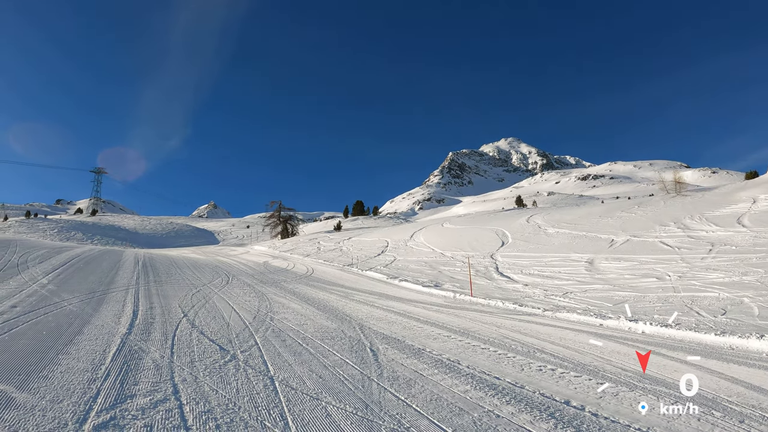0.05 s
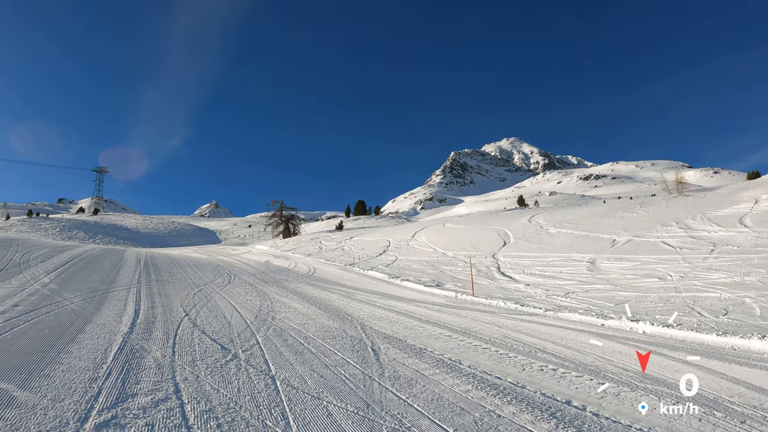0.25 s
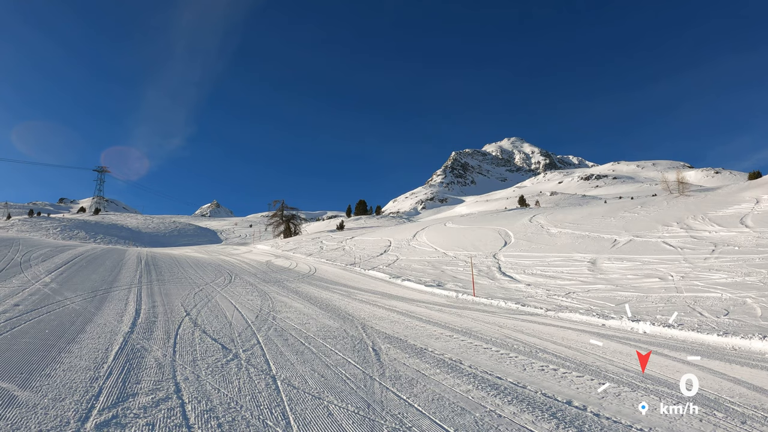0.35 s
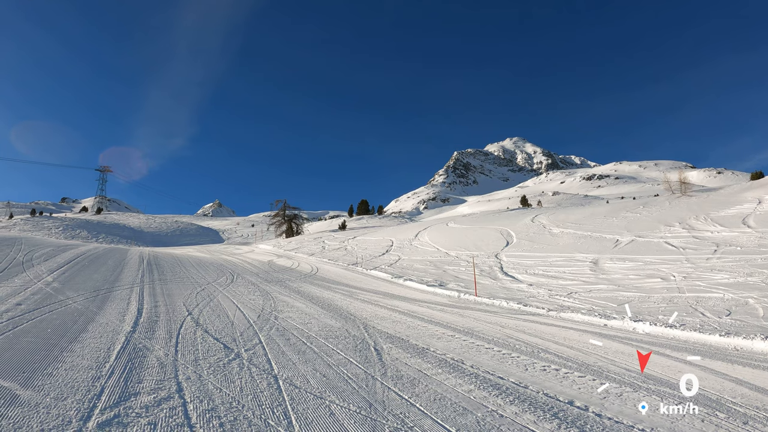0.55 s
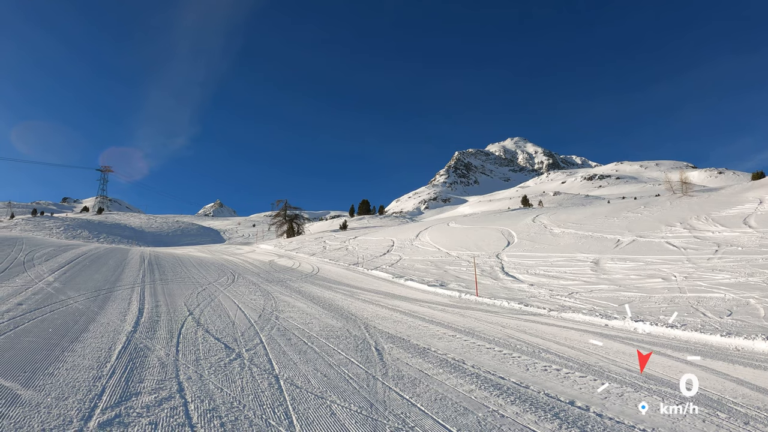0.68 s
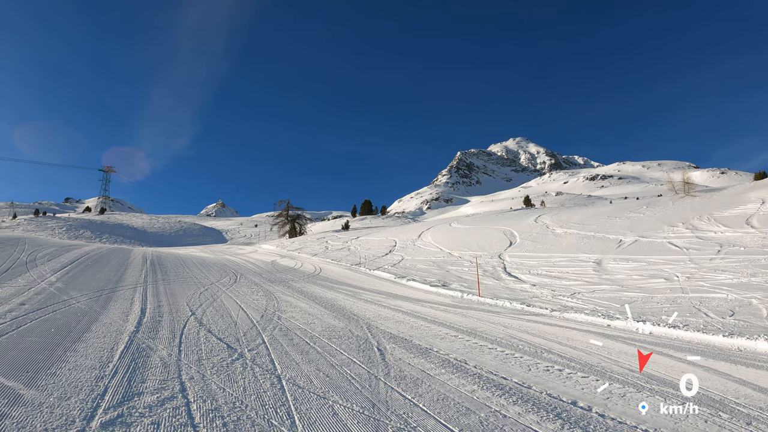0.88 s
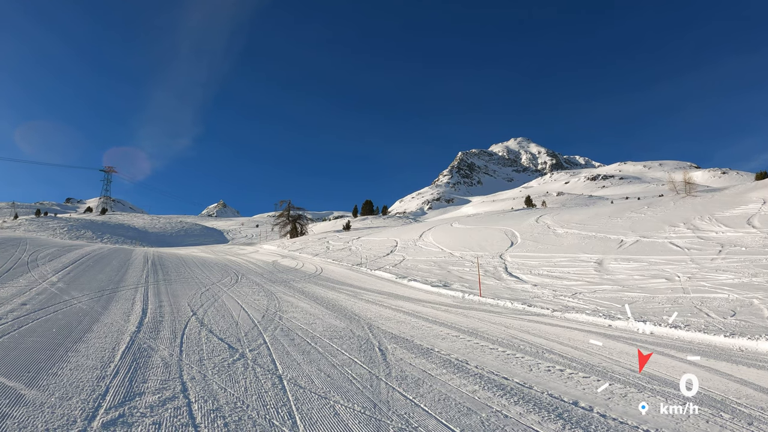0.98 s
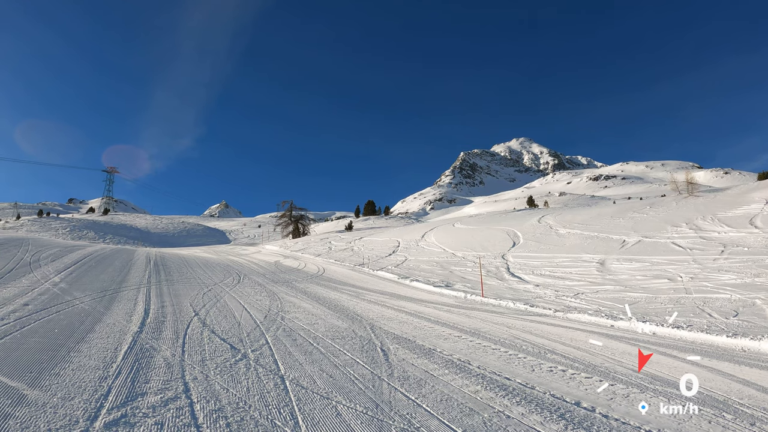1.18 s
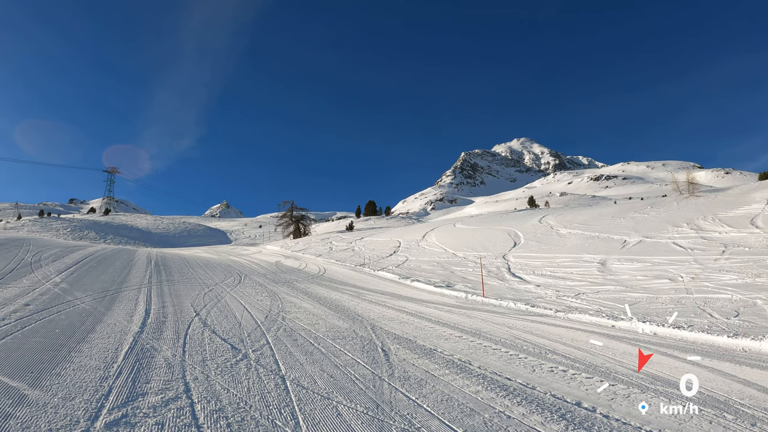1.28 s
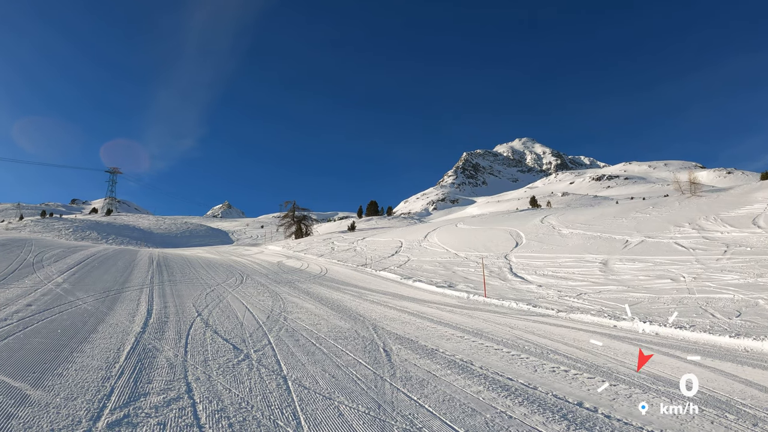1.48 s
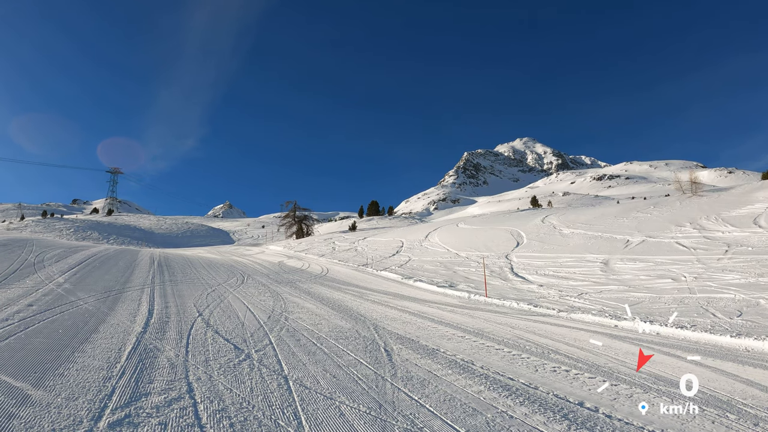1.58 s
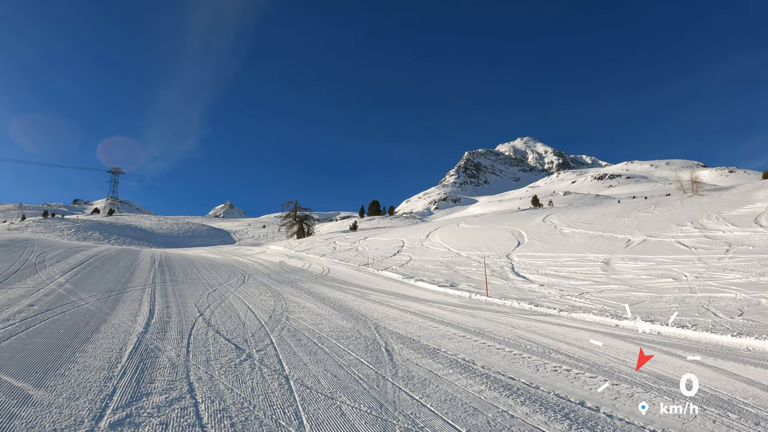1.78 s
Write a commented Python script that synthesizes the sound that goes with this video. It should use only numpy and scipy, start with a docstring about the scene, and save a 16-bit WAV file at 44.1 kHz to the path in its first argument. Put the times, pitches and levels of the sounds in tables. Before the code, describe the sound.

A piece of ski gear knocks sharply close to the microphone, bounces with a brief ring and slides to rest. Dry creaks, jacket swishes and soft bumps follow as it is handled, over light wind on a snowy slope.

```python
"""Gear knock on a ski slope

A piece of gear knocks close by, bounces with a ring and sings briefly as it slides to rest.
Then it is handled: a scuff, dry stick-slip creaks, swishes of jacket cloth and soft bumps.
Light wind rumbles on the microphone throughout."""
import sys
import numpy as np
from scipy import signal
from scipy.fft import rfft, irfft
from scipy.io import wavfile

SR = 44100
rng = np.random.default_rng(int(sys.argv[2]) if len(sys.argv) > 2 else 0)


def bounce(signal):
    """Save signal as a 16-bit WAV file at the path given by the first command-line argument."""
    frames = np.transpose(np.atleast_2d(signal))
    limited = np.clip(frames, -1, 1)
    pcm = np.round(limited * 32767).astype(np.int16)
    wavfile.write(sys.argv[1], SR, pcm)


N = 81585
T = np.arange(N) / SR

# hush of the open slope: freq_hz, density_db
AIR_SPECTRUM = [(200, -93), (400, -102), (800, -106), (1200, -103), (1700, -108), (2400, -117),
                (3500, -123), (6000, -122), (10000, -137)]
# wind buffeting over time: time_s, level_db
GUST_LEVELS = [(0, -49), (.11, -59), (.15, -48), (.225, -48.5), (.27, -58), (.38, -84), (.47, -61.5),
               (.62, -60), (.75, -63.5), (1.0, -54), (1.2, -60.5), (1.29, -48.5), (1.45, -51),
               (1.65, -53.5), (1.85, -64.5)]
# colour of the buffeting: freq_hz, relative_db
BUFFET_SPECTRUM = [(12, -2), (25, 8.5), (40, -2), (60, -12.5), (120, -14.5), (220, -16.5), (350, -26.5),
                   (700, -42), (2000, -77)]
# two low resonances in the rumble: pitch_hz, half_width_hz
DRONE_BANDS = [(91, 16), (170, 20)]
# how they swell: time_s, lower_db, upper_db
DRONE_LEVELS = [(0, -64.5, -52.5), (.13, -55.5, -72.5), (.26, -75, -61.5), (.36, -74, -55.5),
                (.5, -53, -60), (.58, -70, -70.5), (.67, -63, -60.5), (.75, -72.5, -72.5), (.83, -54, -73),
                (.95, -68, -66.5), (1.11, -53, -58.5), (1.22, -63, -67), (1.36, -61, -65),
                (1.56, -57.5, -65), (1.7, -53, -69), (1.75, -59, -68.5), (1.85, -49.5, -52.5)]

# faint bed of clothing rustle: time_s, rub_db, hiss_db
RUSTLE_LEVELS = [(0, -100, -104), (.1, -94, -93), (.2, -64, -75.5), (.45, -69, -75.5), (.58, -77, -75.5),
                 (.68, -73.5, -79), (.88, -73, -76), (1.0, -80, -82.5), (1.25, -68, -70.5), (1.4, -69, -86),
                 (1.52, -67.5, -79.5), (1.66, -66, -84), (1.72, -85, -89), (1.85, -91, -94)]
# jacket swishes: peak_s, rise_s, fall_s, rub_db, hiss_db
CLOTH_SWISHES = [(0.19, 0.11, 0.037, -68.5, -82), (0.51, 0.022, 0.033, -65, -70),
                 (0.526, .005, 0.0082, -56, -64), (0.773, 0.0077, 0.0084, -64.5, -76.5),
                 (1.065, 0.039, 0.17, -68.5, -92), (1.32, 0.052, .036, -67.5, -63.5),
                 (1.45, 0.15, 0.03, -72.5, -76.5), (1.600, 0.03, 0.03, -60, -67),
                 (1.638, 0.0075, 0.012, -59.5, -80.5)]
# colour of the cloth's mid rub: freq_hz, relative_db
RUB_SPECTRUM = [(200, -7.5), (400, -7), (650, -1), (820, -11), (1000, 3), (1300, 3), (1700, -0.5),
                (2700, -5), (4000, -11), (8000, -26.5), (14000, -42.5)]
# colour of its bright hiss: freq_hz, relative_db
HISS_SPECTRUM = [(1000, -23.5), (3300, -11), (5000, 0), (7300, 1), (9000, -5), (10500, -12.5),
                 (12300, -16.5), (14000, -31.5)]

# soft handling bumps: start_s, level_db
BUMP_HITS = [(0.508, -53.5), (1.3668, -46), (1.6348, -46.5)]
# body of a bump: pitch_hz, relative_db, t60_s
BUMP_BODY = [(455.7, -5, 0.015), (706, -2, 0.008), (1278, -1.5, .009)]
# creaking ticks: start_s, body_db, crackle_db, pitch_ratio
CREAK_TICKS = [(0.1561, -63, -55.5, 0.9), (0.1837, -66, -54.5, 0.76), (0.3342, -40, -56, 0.74),
               (0.887, -64.5, -57, 0.65), (0.973, -50, -53.5, 0.74), (0.988, -64, -58, 1.1),
               (1.0096, -44.5, -59, 0.85), (1.0200, -58, -70, 1.5), (1.0327, -45, -52.5, 1.12),
               (1.0375, -52.5, -62, 2.34), (1.0472, -41, -46, 1.02), (1.0498, -56, -52.5, 0.62),
               (1.0553, -56, -66, 1.0), (1.0652, -47, -47, 1.58), (1.0786, -52, -46, 2.8),
               (1.0924, -66, -45, 1.3), (1.1105, -45, -52, 0.96), (1.1334, -42, -56, 1.06),
               (1.157, -37, -47, 1.06), (1.1584, -44.5, -58, 1.45), (1.1818, -37.5, -56, 1.14),
               (1.5020, -64, -55, 0.56)]
# body of a tick: base_pitch_hz, relative_db, t60_s
TICK_BODY = [(1280, -2.5, 0.0063), (1970, -1, 0.0039), (2610, -8, 0.0035)]
# colour of a tick's crackle: freq_hz, relative_db
CRACKLE_SPECTRUM = [(500, 4.5), (1200, 8), (2600, -3), (5500, -0.5), (7800, -3.5), (10000, -18),
                    (11800, -20), (13200, -38)]

# the gear singing as it slides: time_s, level_db
SINGING_LEVELS = [(0.36, -110), (0.41, -61.5), (0.48, -69), (0.505, -74), (0.53, -55.5), (0.555, -67),
                  (0.6, -94), (0.66, -120)]
# the gear's modes: pitch_hz
GEAR_PITCHES = (498, 705, 998, 1332, 1668, 2168, 2475, 2742, 3205, 3675, 4170, 5020, 5600, 7400)
# ring of each mode: relative_db, base_t60_s
GEAR_DECAYS = [(-49.5, 0.078), (-38.5, .05), (-38.5, 0.09), (-31.5, .045), (-31, 0.047), (-27.5, 0.03),
               (-27, 0.033), (-18, 0.028), (-33, 0.041), (-30, 0.03), (-26, 0.01), (-27, 0.011),
               (-33.5, .011), (-43, 0.012)]
# the gear's dense, weaker overtones: freq_hz, relative_db
OVERTONE_SPECTRUM = [(150, -77.5), (300, -75.5), (450, -84), (800, -67.5), (1250, -62.5), (2700, -66.5),
                     (4500, -70), (6500, -78), (8500, -82.5), (13000, -108)]
# bounces: start_s, gain_db, brightness_hz, ring_length_ratio, retouch_delay_s, retouch_ratio, crack_db
BOUNCES = [(0.2298, -0.5, 9900, 1.21, 0.0018, 0.08, 6), (0.2422, -21, 2197, .6, .001, .2, 4),
           (0.3060, -13, 6000, 1.15, .0055, 0.6, 3), (0.3672, -18.5, 5900, 0.99, 0.001086, 0.74, 9),
           (0.4158, -32.5, 2960, 1.45, 0.0011, 0.64, -19), (0.4565, -37.5, 2660, 0.48, 0.0011, 0.5, -9)]

WIND_SIDE_DB, DRONE_SIDE_DB, AIR_SIDE_DB, NEAR_SIDE_DB = -17, -9.5, -2, -14   # stereo width
WIND_PAN_DB, CLOTH_PAN_DB, HANDLING_PAN_DB, KNOCK_PAN_DB = -6, 2, 3, -1
GRAIN_DB, GRAIN_PER_S = 1.5, 500
CRACKLE_T60_S, TICK_TAIL_DB, TICK_TAIL_T60_S, TICK_TOP_HZ = 0.0063, -21, 0.045, 11000
SINGING_HZ, SINGING_HALF_WIDTH_HZ = 1355, 110
OVERTONE_T60_S, CRACK_T60_S = 0.041, 0.0047
PORT_HZ, PORT_Q, PORT_SKEW_DB = 2500, 2.6, -7.5
DECAY_BOW = 1.2   # above 1, a ring holds at first and then drops faster
HIGH_CUT_HZ = 13600


def from_db(db):
    """Decibels to gain."""
    return 10 ** (np.asarray(db) / 20)


def level(rows, column=1):
    """Fader ride from one dB column of a timed table."""
    rows = np.array(rows)
    return from_db(np.interp(T, rows[:, 0], rows[:, column]))


def pan(db):
    """Left and right gains; positive leans left."""
    return from_db(np.array([[db], [-db]]) / 2)


def stereo_white(side_db):
    """White noise, mostly common to both channels."""
    mid, side = rng.standard_normal((2, N))
    return mid + from_db(side_db) * np.array([side, -side])


def rms_one(x):
    """Scale to unit rms."""
    return x / np.sqrt(np.mean(x ** 2) + 1e-20)


def noise(spectrum, side_db):
    """Stereo noise coloured by a density curve in dB."""
    hz, db = np.transpose(spectrum)
    freqs = np.arange(N // 2 + 1) * SR / N
    gain = from_db(np.interp(np.log(freqs + 1e-9), np.log(hz), db)) * np.sqrt(SR / 2)
    return irfft(rfft(stereo_white(side_db)) * gain, N)


def narrow_noise(hz, half_width_hz, side_db):
    """Noise in one resonance, at unit rms."""
    freqs = np.arange(N // 2 + 1) * SR / N
    return rms_one(irfft(rfft(stereo_white(side_db)) / (1 + ((freqs - hz) / half_width_hz) ** 2), N))


def fade(t, t60):
    """Gain of a ring, t seconds after it is struck."""
    return from_db(-60 * np.clip(t / t60, 0, 3) ** DECAY_BOW)


def decay(start, t60):
    """Hard attack that dies away."""
    return (T >= start) * fade(T - start, t60)


def swell(peak, rise, fall):
    """Smooth hump with its own rise and fall."""
    return np.exp(-.5 * ((T - peak) / np.where(T < peak, rise, fall)) ** 2)


def ring(start, modes, length=1, pitch=1):
    """Damped sines struck together, neighbours in opposite polarity."""
    out, first = np.zeros(N + SR), int(np.ceil(start * SR))
    t = (first + np.arange(SR // 4)) / SR - start
    for k, (hz, db, t60) in enumerate(modes):
        envelope = from_db(db) * fade(t, t60 * length)
        out[first:first + len(t)] += (-1) ** k * envelope * np.sin(2 * np.pi * hz * pitch * t)
    return out[:N]


def wind():
    """Lumpy buffeting, two low resonances and the hush of the open slope."""
    buffet = level(GUST_LEVELS) * rms_one(noise(BUFFET_SPECTRUM, WIND_SIDE_DB)) * pan(WIND_PAN_DB)
    drone = sum(level(DRONE_LEVELS, column=k + 1) * narrow_noise(hz, half_width_hz, DRONE_SIDE_DB)
                for k, (hz, half_width_hz) in enumerate(DRONE_BANDS))
    return buffet + drone + noise(AIR_SPECTRUM, AIR_SIDE_DB)


def jacket_cloth():
    """Fabric slides: a mid rub and a bright hiss, both grainy from the weave."""
    rub_power = level(RUSTLE_LEVELS) ** 2
    hiss_power = level(RUSTLE_LEVELS, column=2) ** 2
    for peak, rise, fall, rub_db, hiss_db in CLOTH_SWISHES:
        stroke = swell(peak, rise, fall)
        rub_power += (from_db(rub_db) * stroke) ** 2
        hiss_power += (from_db(hiss_db) * stroke) ** 2
    grain = from_db(GRAIN_DB * np.interp(T * GRAIN_PER_S, np.arange(N), rng.standard_normal(N)))
    rub = np.sqrt(rub_power) * rms_one(noise(RUB_SPECTRUM, NEAR_SIDE_DB))
    hiss = np.sqrt(hiss_power) * rms_one(noise(HISS_SPECTRUM, NEAR_SIDE_DB))
    return grain * (rub + hiss) * pan(CLOTH_PAN_DB)


def soft_bumps():
    """Dull, padded touches that barely ring."""
    return sum(from_db(db) * ring(start, BUMP_BODY) for start, db in BUMP_HITS) * pan(HANDLING_PAN_DB)


def creaking_ticks():
    """Stick-slip snaps: a dead little body, a bright crackle and a faint tail of the gear's ring."""
    body = crackle_envelope = tail_envelope = 0
    for start, body_db, crackle_db, pitch in CREAK_TICKS:
        body += from_db(body_db) * ring(start, TICK_BODY, pitch=pitch)
        crackle_envelope += from_db(crackle_db) * decay(start, CRACKLE_T60_S)
        tail_envelope += from_db(body_db + TICK_TAIL_DB) * decay(start, TICK_TAIL_T60_S)
    crackle = crackle_envelope * rms_one(noise(CRACKLE_SPECTRUM, NEAR_SIDE_DB))
    tail = tail_envelope * rms_one(noise(OVERTONE_SPECTRUM, NEAR_SIDE_DB))
    soften = signal.butter(6, TICK_TOP_HZ, fs=SR, output="sos")
    return signal.sosfilt(soften, body + crackle + tail) * pan(HANDLING_PAN_DB)


def gear_singing():
    """As the gear slides to rest, friction keeps one of its modes ringing."""
    return level(SINGING_LEVELS) * narrow_noise(SINGING_HZ, SINGING_HALF_WIDTH_HZ, NEAR_SIDE_DB)


def microphone_ports(x):
    """A sound from one side reaches the two ports with different phase around their resonance."""
    omega = 2 * np.pi * PORT_HZ
    b, a = signal.bilinear(np.array([-1, 0, omega ** 2]) / (2 * PORT_Q),
                           [1, omega / PORT_Q, omega ** 2], SR)
    skew = from_db(PORT_SKEW_DB) * signal.lfilter(b, a, x)
    return x + skew * np.array([[1], [-1]])


def gear_knocks():
    """Each bounce cracks, rings the gear's modes and touches again at once; weak blows are duller."""
    overtones = noise(OVERTONE_SPECTRUM, NEAR_SIDE_DB)
    crack_noise = noise(OVERTONE_SPECTRUM, NEAR_SIDE_DB)
    modes = [(hz, db, t60) for hz, (db, t60) in zip(GEAR_PITCHES, GEAR_DECAYS)]
    out = 0
    for start, db, brightness_hz, length, retouch_s, retouch_ratio, crack_db in BOUNCES:
        body = ring(start, modes, length)
        retouch = -retouch_ratio * np.interp(T - retouch_s, T, body)   # delayed, polarity flipped
        tail = overtones * decay(start, OVERTONE_T60_S)
        crack = from_db(crack_db) * crack_noise * decay(start, CRACK_T60_S)
        contact_lowpass = signal.butter(2, brightness_hz, fs=SR, output="sos")
        out += from_db(db) * signal.sosfilt(contact_lowpass, body + retouch + tail + crack)
    return microphone_ports(out) * pan(KNOCK_PAN_DB)


def scene():
    """The mix, close and dry over the snow."""
    return gear_knocks() + gear_singing() + creaking_ticks() + soft_bumps() + jacket_cloth() + wind()


def record(dry):
    """A steep high cut on the whole mix."""
    return signal.sosfilt(signal.ellip(10, .1, 80, HIGH_CUT_HZ, fs=SR, output="sos"), dry)


dry = scene()
out = record(dry)
bounce(out)
```